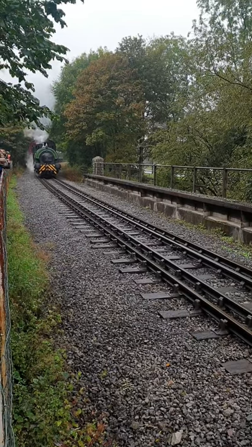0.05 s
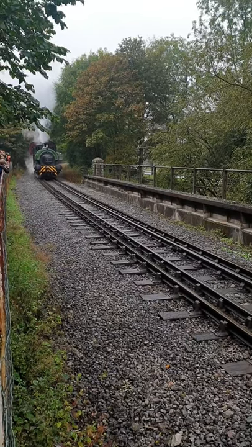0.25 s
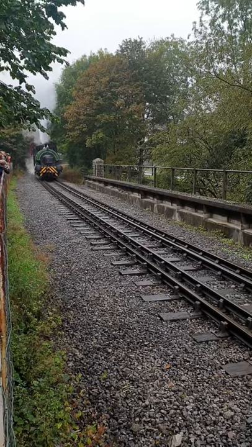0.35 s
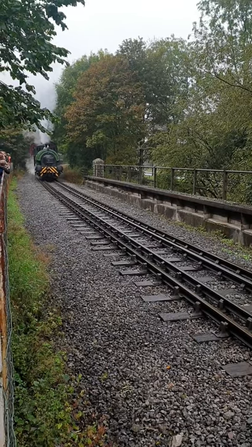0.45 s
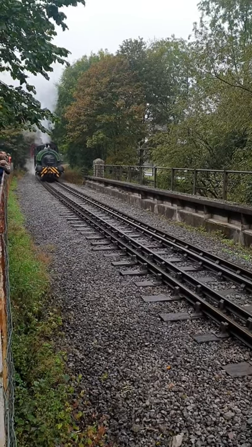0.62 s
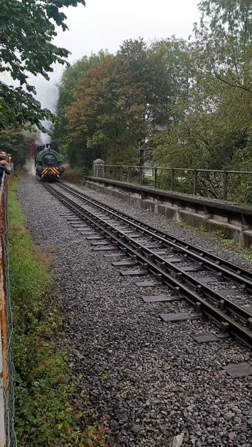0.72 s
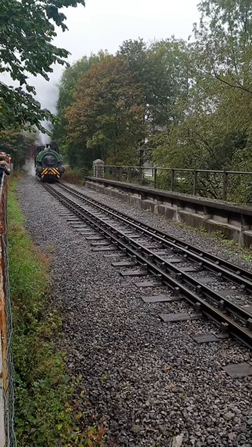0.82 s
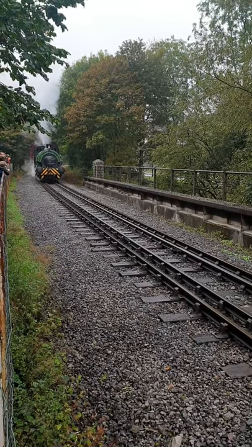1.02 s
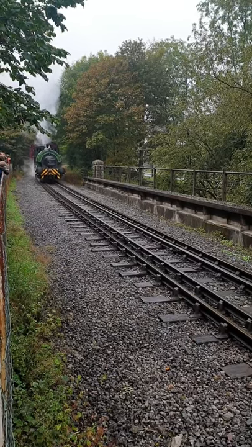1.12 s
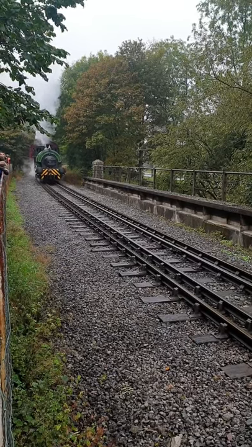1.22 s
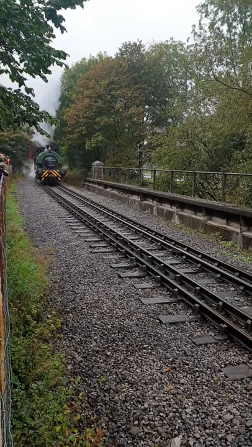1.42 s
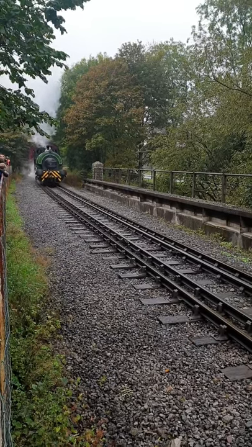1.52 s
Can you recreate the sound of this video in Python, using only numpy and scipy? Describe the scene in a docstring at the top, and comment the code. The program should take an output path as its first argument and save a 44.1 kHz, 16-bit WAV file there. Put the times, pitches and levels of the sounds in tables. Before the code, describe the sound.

A steam locomotive whistle toots twice outdoors. Soft steam hiss and unsteady low rumble open the scene. At about 0.23 seconds a high, breathy toot scoops upward, wavers, and drops in pitch near 0.6. A shorter toot follows from 0.86 to 1.14. Rushing steam accompanies both, and trees return a diffuse, fading echo until the end, around 1.5 seconds. The sound leans left, with the engine fainter after the first loud blast.

```python
"""Two toots from a distant steam locomotive

A steam whistle toots twice in a cutting lined with trees, over hissing steam and a rumbling engine.
Each toot is a stack of sine waves: its pitch scoops up as steam arrives and sags as the valve shuts.
A jet of noise rushes out with each toot, and the trees ring on after it as a fading random echo.
Steam and rumble are filtered noise; loud peaks push the recorder's gain down, and it stays down.
"""
import sys
import numpy as np
from scipy import signal
from scipy.fft import rfft, irfft
from scipy.io import wavfile
from scipy.ndimage import uniform_filter1d

SR = 44100
rng = np.random.default_rng(int(sys.argv[2]) if len(sys.argv) > 2 else 0)


def bounce(signal):
    """Save signal as a 16-bit WAV file at the path given by the first command-line argument."""
    frames = np.transpose(np.atleast_2d(signal))
    limited = np.clip(frames, -1, 1)
    pcm = np.round(limited * 32767).astype(np.int16)
    wavfile.write(sys.argv[1], SR, pcm)


N = 68355  # length in samples, 1.55 s
TIME = np.arange(N) / SR  # s
BINS = np.fft.rfftfreq(N, 1 / SR)  # Hz


def amp(db):
    """Turns decibels into a gain."""
    return 10 ** (np.asarray(db) / 20)


def unit(x):
    """Scales a signal to an average strength (rms) of 1."""
    return x / np.sqrt(np.mean(x ** 2) + 1e-20)


def read(points, hz):
    """Reads a table of values against frequency, on a log-frequency axis."""
    f, value = np.transpose(points)
    return np.interp(np.log(hz + 1), np.log(f + 1), value)


def wander(rate_hz):
    """Makes random motion of rms 1 that fades out above rate_hz."""
    smoothing = 1 / (1 + (BINS / rate_hz) ** 4)
    return unit(irfft(rfft(rng.standard_normal(N)) * smoothing, N))


# How alike noise is at the two microphones: 1 is identical, 0 unrelated, below 0 partly opposite
# columns: f/Hz, likeness [-1 to 1]
NOISE_LIKENESS = [(60, 1), (130, .95), (280, 0.94), (620, 0.75), (1350, 0.25), (3000, -0.095), (6400, -0.4),
                  (11000, 0.33), (14000, -0.013)]


def noise(spectrum):
    """Colours random noise for two microphones, alike in the bass and less so higher up."""
    left, other = rfft(rng.standard_normal((2, N)))
    same = read(NOISE_LIKENESS, BINS)
    right = same * left + np.sqrt(1 - same ** 2) * other
    return unit(irfft(np.array([left, right]) * amp(read(spectrum, BINS)), N))


# Tone colour of the escaping steam; columns: f/Hz, relative level/dB
STEAM_SPECTRUM = [(100, -15), (300, 0), (600, 3.5), (1400, 1), (2600, -3.5), (4000, -1), (5600, 4.5),
                  (7000, -1), (8400, -17), (9500, -11.5), (11200, -5), (14500, -12.5)]
# Tone colour of the engine's rumble; columns: f/Hz, relative level/dB
RUMBLE_SPECTRUM = [(20, -27), (36, -19), (50, 1), (63, -0.5), (80, -5.5), (105, -12), (140, -22.5),
                   (188, -9), (230, -19.5), (330, -27.5), (600, -39), (2000, -75)]
# Loudness of the engine before the recorder; columns: t/s, steam level/dB, rumble level/dB
ENGINE_LEVELS = [(0, -28, -31), (.06, -29, -29.5), (.15, -30, -35), (.23, -29.5, -30.5), (.33, -34, -35),
                 (.5, -35, -41.5), (.58, -29, -30.5), (.66, -35.5, -41.5), (.76, -36.5, -32),
                 (.9, -36, -40), (1.08, -36.5, -32.5), (1.18, -36, -39.5), (1.36, -37.5, -40.5),
                 (1.55, -35, -32)]


def engine():
    """Escaping steam and the running engine's low rumble: two coloured noises that swell and dip."""
    s, steam_db, rumble_db = np.transpose(ENGINE_LEVELS)
    steam = noise(STEAM_SPECTRUM)
    unsteady_db = 0.67 * wander(28)
    steam = steam * amp(np.interp(TIME, s, steam_db) + unsteady_db)
    rumble = noise(RUMBLE_SPECTRUM) * amp(np.interp(TIME, s, rumble_db))
    return steam + rumble


# Path of each toot; columns: t/s, pitch f/Hz, direct level/dB of the lowest partial (left, before recorder)
FIRST_TOOT_PATH = [(.226, 873, -33), (.24, 945, -14.5), (.258, 985, -5.5), (.27, 1005, -11.5),
                   (.282, 1016, -4), (.295, 1024, -14), (.314, 1034, 5), (.355, 1042, 3), (.415, 1054, -2),
                   (.436, 1060, -12), (.458, 1068, 0.5), (.495, 1082, -18.5), (.535, 1085, -3.5),
                   (.575, 1085, -9.5), (.603, 986.6, -3.5), (.628, 885.4, -25)]
SECOND_TOOT_PATH = [(.855, 895, -37), (.878, 982.5, -8.5), (.9, 1051, -16), (.926, 1075, 1),
                    (.942, 1079, -9), (.956, 1082, -0.5), (.985, 1084, -16), (1.022, 1089, -2),
                    (1.076, 1088, -18.5), (1.098, 1077, -4), (1.12, 948, -20.5), (1.138, 888, -14)]
# The whistle's partials, lowest first; the lowest takes its direct level from the toot's path
# columns: direct level/dB, level/dB sent to the trees, power of steam pressure it grows with [no unit]
WHISTLE_PARTIALS = [(0, -12.5, 0.89), (-24.5, -29, 1.5), (-21, -26, 2.35), (-24, -26, 1.94),
                    (-32.5, -41.5, 1.9), (-46, -45, 3)]
SHUT_HZ, FULL_HZ = 880, 1075.3  # pitch with no steam and at full pressure
WAVER, WAVER_HZ = 0.0031, 112  # random pitch motion: rms share of the pitch, top rate
FLUTTER_DB, FLUTTER_HZ = 4.33, 68.6  # random level motion of the upper partials: rms, top rate
RIGHT_DIRECT_DB, RIGHT_LAG_S = -7.5, .00007  # direct sound on the right against the left
GATE_S = 0.0082  # fade at each end of a toot


def whistle(toot):
    """One pipe: steam pressure lifts pitch and overtones; gives direct sound and what reaches the trees."""
    s, pitch, level_db = np.transpose(toot)
    hz = np.interp(TIME, s, pitch)
    # pressure is worked out from the pitch
    pressure = np.clip((hz - SHUT_HZ) / (FULL_HZ - SHUT_HZ), .001, 1)
    gate = np.clip(np.minimum(TIME - s[0], s[-1] - TIME) / GATE_S, 0, 1)
    left_turns = np.cumsum(hz * (1 + WAVER * wander(WAVER_HZ))) / SR  # cycles so far
    turns = np.array([left_turns, left_turns - hz * RIGHT_LAG_S])
    direct, to_trees = 0, 0
    for k, (direct_db, trees_db, power) in enumerate(WHISTLE_PARTIALS, 1):
        wave = gate * np.sin(2 * np.pi * k * turns)
        growth = pressure ** power
        flutter = amp(FLUTTER_DB * wander(FLUTTER_HZ))
        # the lowest partial follows its own levels, without flutter
        size = amp(np.interp(TIME, s, level_db)) if k == 1 else growth * flutter
        direct = direct + amp(direct_db) * size * wave
        to_trees = to_trees + amp(trees_db) * growth * wave[0]
    return direct * amp([[0], [RIGHT_DIRECT_DB]]), to_trees


# Steam jets at the whistle mouth; columns: opens t/s, shuts t/s, level/dB before the recorder
JET_TIMES = [(0.237, 0.58, -26.5), (0.867, 1.097, -24.5)]
# Tone colour of the jet; columns: f/Hz, relative level/dB
JET_SPECTRUM = [(100, -33), (350, -20.5), (600, -4.5), (1400, -6), (2500, -2), (3600, -0.5), (5500, 1.5),
                (7000, -2), (8400, -15), (9500, -11), (11200, 1), (14500, -10)]
JET_RISE_S, JET_FALL_S = 0.052, 0.023  # straight rise, exponential fall


def jet():
    """Steam rushes from the whistle while the valve is open, as noise, and dies off when it shuts."""
    flow = 0
    for opens, shuts, db in JET_TIMES:
        rise = np.clip((TIME - opens) / JET_RISE_S, 0, 1)
        fall = np.exp(-np.maximum(TIME - shuts, 0) / JET_FALL_S)
        flow = flow + amp(db) * rise * fall
    return flow * noise(JET_SPECTRUM)


# How long the echo takes to fade by 60 dB; columns: f/Hz, fade time t/s
TREES_FADE = [(200, 0.93), (1000, 1.51), (2200, 1.43), (4300, 0.98), (7000, 0.66), (12000, 0.31)]
TREES_DELAY_S, TREES_BUILD_S = 0.017, 0.028
TREES_LIKENESS = 0.57  # left-right likeness of the echo


def trees(x):
    """Dense scatter from trunks and leaves: the echo builds up, then dies, the treble first."""
    hz, t, z = signal.stft(rng.standard_normal((2, N)), SR, nperseg=256)
    t60 = read(TREES_FADE, hz)[:, None]
    # the square root keeps long-lasting bands from gaining energy
    fading = z * amp(-60 * t / t60) / np.sqrt(t60)
    tail = signal.istft(fading, SR, nperseg=256)[1][:, :N]
    left, other = tail * np.clip((TIME - TREES_DELAY_S) / TREES_BUILD_S, 0, 1)
    right = TREES_LIKENESS * left + np.sqrt(1 - TREES_LIKENESS ** 2) * other
    echo = np.array([left, right]) / np.linalg.norm(left)
    return signal.fftconvolve(x[None], echo, axes=1)[:, :N]


def scene():
    """Adds whistle and jet, with their echo from the trees, to the engine."""
    first, first_to_trees = whistle(FIRST_TOOT_PATH)
    second, second_to_trees = whistle(SECOND_TOOT_PATH)
    hiss = jet()
    hiss_to_trees = amp(-7) * hiss[0]
    echo = trees(first_to_trees + second_to_trees + hiss_to_trees)
    return first + second + hiss + echo + engine()


# Response of the shaded right microphone against the left; columns: f/Hz, level/dB
RIGHT_MIC_RESPONSE = [(60, -4), (200, -4), (400, -10), (1100, -5), (2200, -8), (4200, -10), (6800, -9.5),
                      (8800, -2), (11000, -2.5), (14000, -1)]
CEILING_DB = -1.13  # peaks above this, re full scale, turn the gain down
EDGE_HZ = 14550  # upper band limit


def record(dry):
    """A shaded right microphone, a limiter whose gain drops and stays down, and a treble cut-off."""
    right = irfft(rfft(dry[1]) * amp(read(RIGHT_MIC_RESPONSE, BINS)), N)
    heard = np.array([dry[0], right])
    peak_db = 20 * np.log10(abs(heard).max(0) + 1e-9)
    over_db = np.maximum(peak_db - CEILING_DB, 0)
    # hold the largest overshoot so far, with each step smoothed over 200 samples
    duck_db = uniform_filter1d(np.maximum.accumulate(over_db), size=200)
    low_pass = signal.firwin(511, EDGE_HZ, window=("kaiser", 9), fs=SR)
    return signal.oaconvolve(heard * amp(-duck_db), low_pass[None], "same")


dry = scene()
out = record(dry)
bounce(out)
```